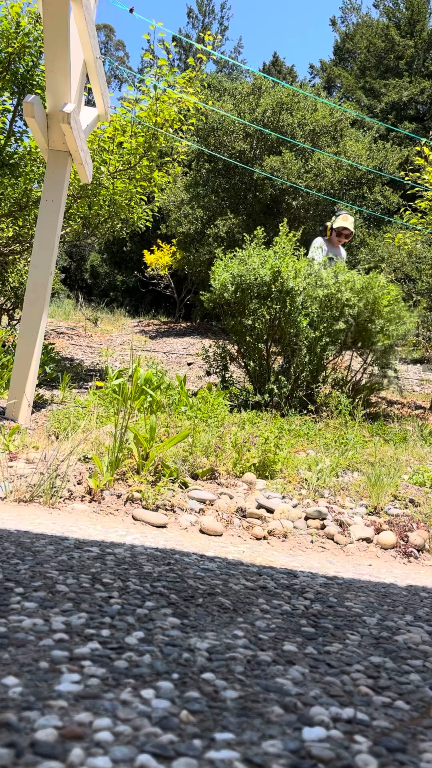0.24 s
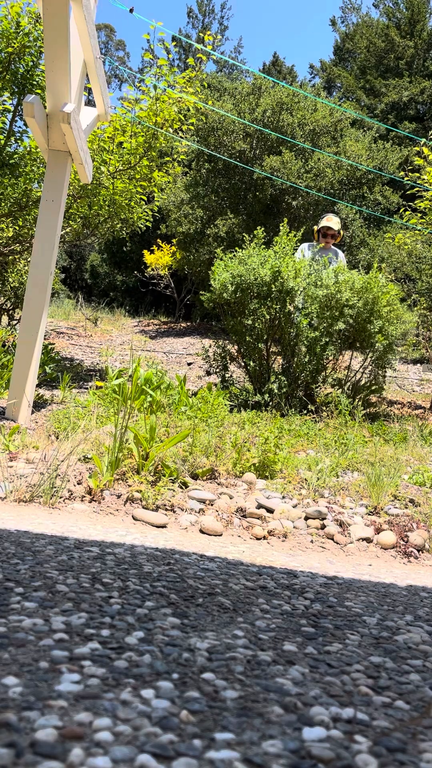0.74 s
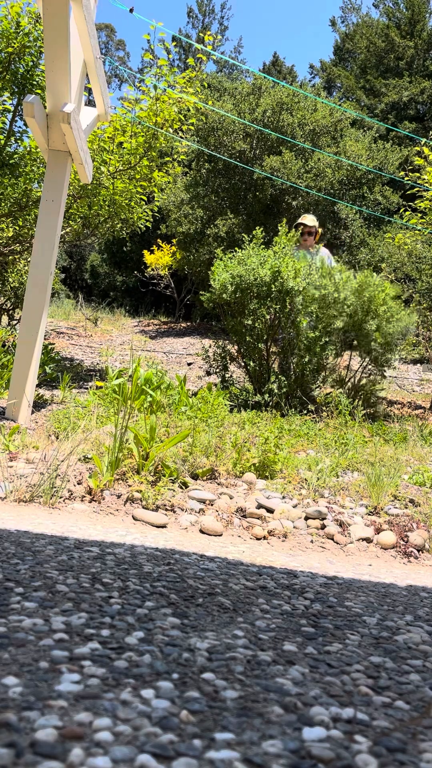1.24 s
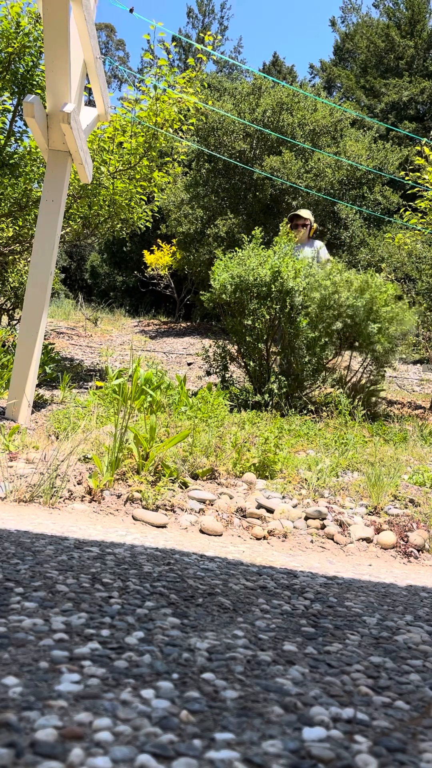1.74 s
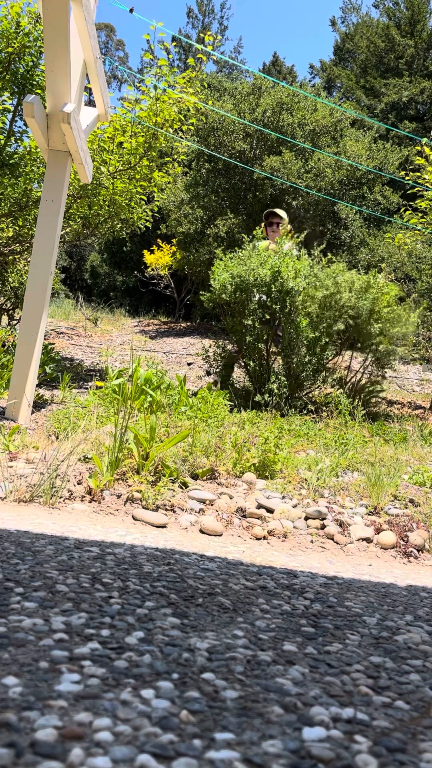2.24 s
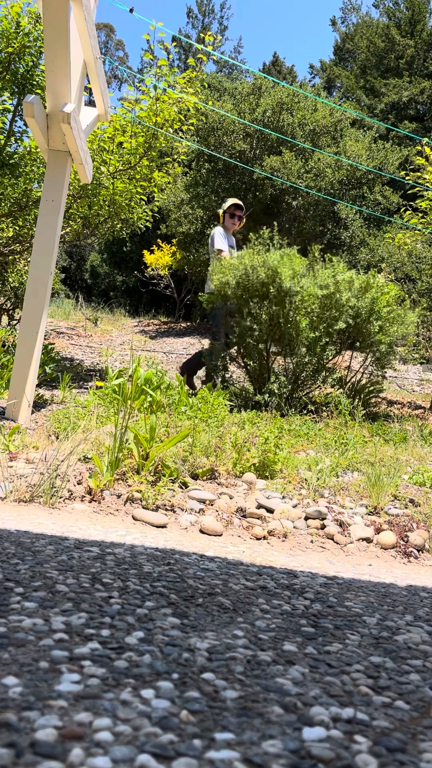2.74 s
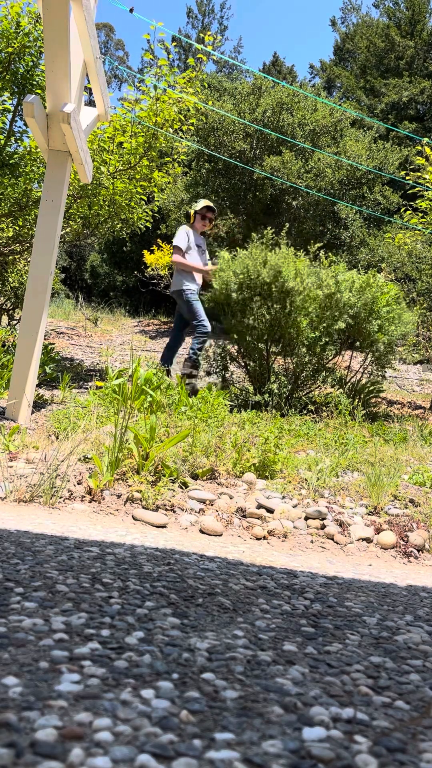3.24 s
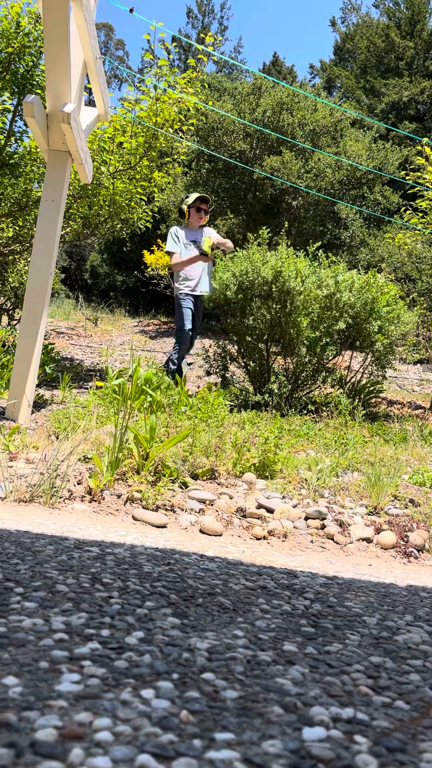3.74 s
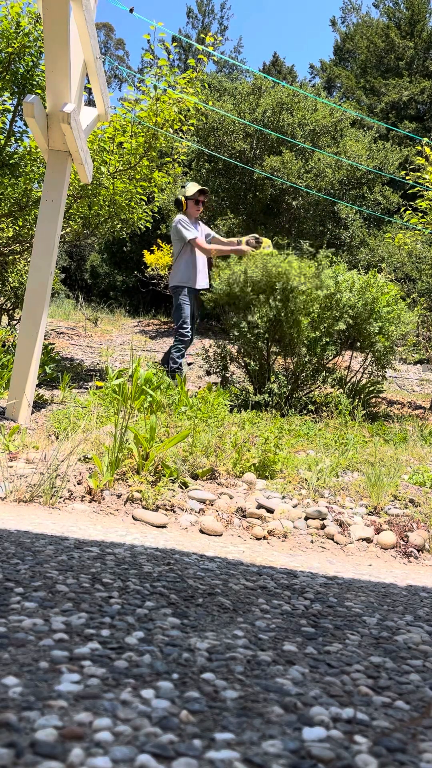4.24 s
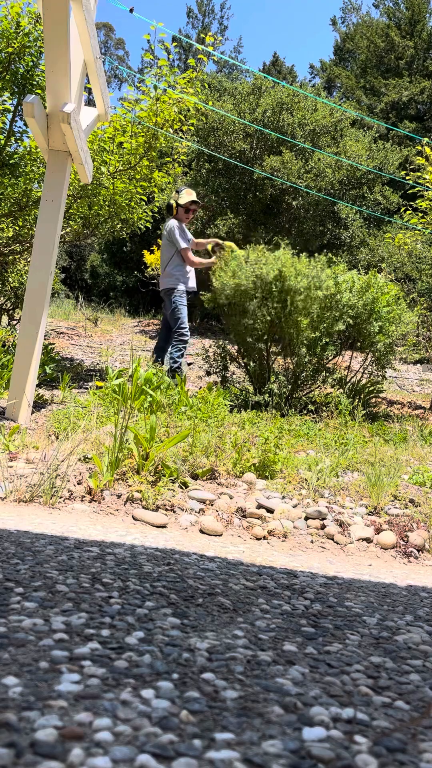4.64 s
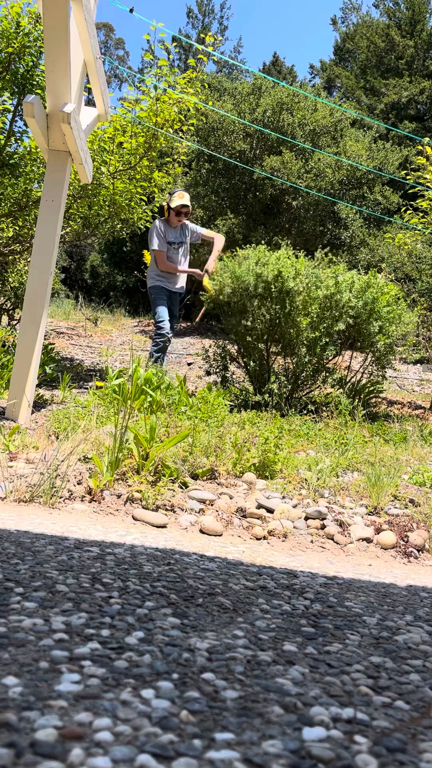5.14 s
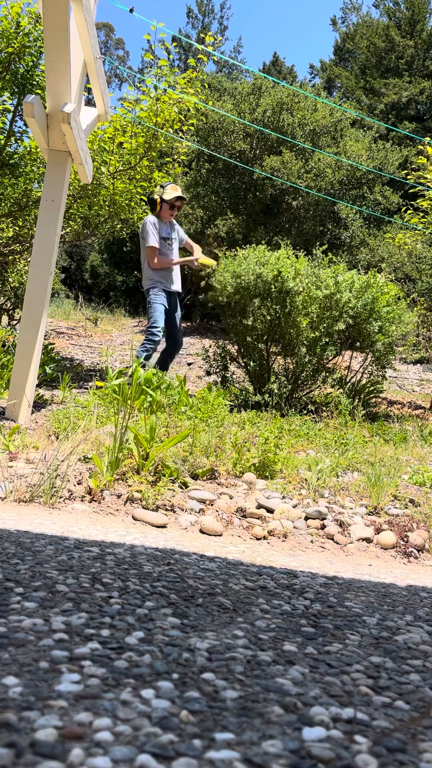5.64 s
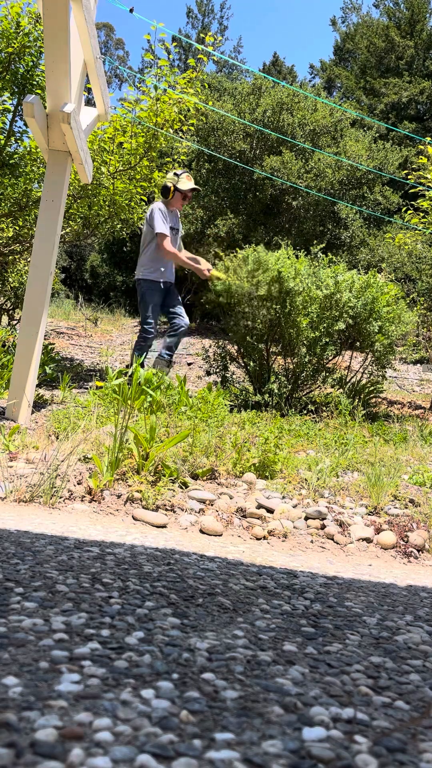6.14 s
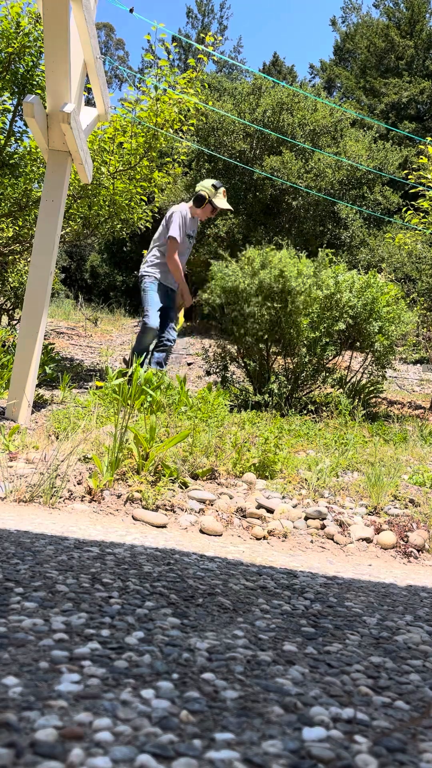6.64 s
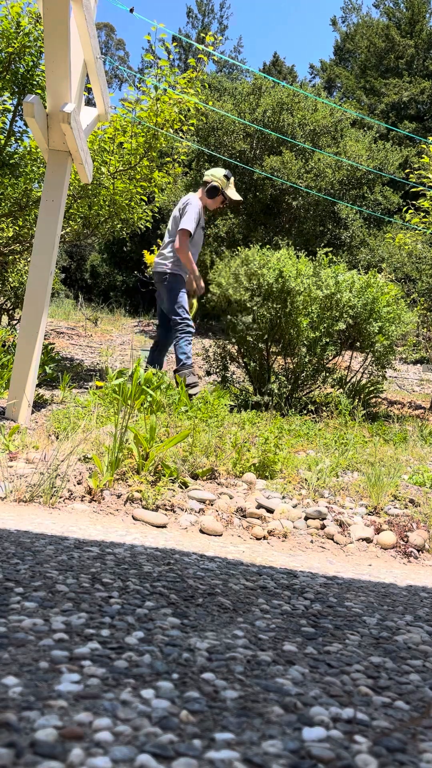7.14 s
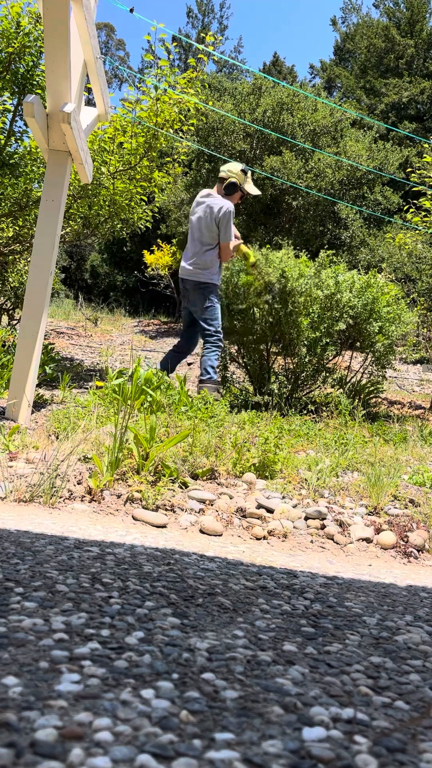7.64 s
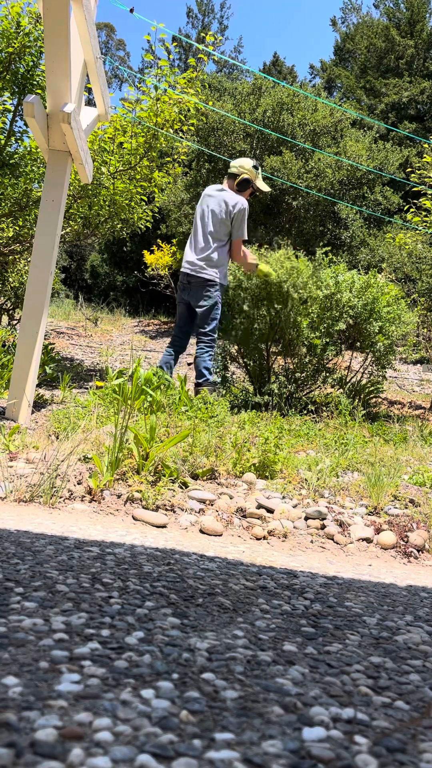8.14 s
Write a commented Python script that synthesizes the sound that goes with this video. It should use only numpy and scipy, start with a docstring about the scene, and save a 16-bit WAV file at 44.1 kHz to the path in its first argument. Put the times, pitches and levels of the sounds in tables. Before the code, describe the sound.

A hedge trimmer runs throughout about 8.4 seconds, some metres from a stereo microphone pair in a garden. It starts nearly end-on, its blades rattling about 39 strokes a second over a gritty gear buzz, low hum and thin wavering whine. Around 1.1 seconds it sags noticeably in thick growth and several twigs crack; it bogs again at 2.4 with sharp snaps. A smaller dip and snaps come at 4.1, a slight drag without a loud crack at 5.2, then another slowdown with a splintery cluster at 6.2. Near 6.7 the tool turns end-on and the bar's ring recedes; by 7.4 it swings broadside, its metallic clatter fuller, and strong snaps run through 7.4-7.7 and 8.0-8.2 with two more dips. It never stops. Beneath lie soft low outdoor rumble and a faint far machine hum, with short scatter from ground and bushes.

```python
"""A hedge trimmer some metres off in a garden, heard by a microphone pair over outdoor rumble and a far hum.
It opens nearly end-on, blades rattling 39 strokes a second over a gear buzz, a low hum and a thin motor whine.
Around 1.1, 2.4, 4.1 and 6.2 s it slows in thick growth and twigs snap; a brief drag at 5.2 s has no loud snap.
It turns end-on again near 6.7 s, then swings broadside by 7.4 s for a last run of snaps and two more slowdowns.
Noise and tiny impacts ring the tool's parts, bursts make the twigs, and sines that follow the strokes the motor."""
import sys
import numpy as np
from scipy import signal
from scipy.fft import rfft, irfft, next_fast_len
from scipy.io import wavfile
from scipy.ndimage import uniform_filter1d, map_coordinates

SR = 44100
rng = np.random.default_rng(int(sys.argv[2]) if len(sys.argv) > 2 else 0)


def unload_audio(sound):
    """Save the sound as a 16-bit wav file, at the path given as the first command line argument."""
    columns = np.transpose(np.atleast_2d(sound))
    # keep every value between -1 and 1, then stretch to whole-number steps
    steps = np.round(np.clip(columns, -1, 1) * 32767)
    wavfile.write(sys.argv[1], SR, steps.astype(np.int16))


N = 369558

# resonances of the gear case, hand guard, blade bar, blade teeth and free blade tip, relative within each part:
# centre_hz, half_width_hz (where it is 6 dB down), level_db
CASE_MODES = [(756, 450, -1.5), (1166, 416, 3), (1494, 254, -0.5), (4770, 400, -0.5)]
GUARD_MODES = [(1936, 195, 0)]
BAR_MODES = [(2602, 360, -0.2), (2806, 320, -0.8)]
TEETH_MODES = [(3638, 235, 14.5), (3780, 430, -9)]
TIP_MODES = [(7470, 170, 0), (12300, 240, -6)]
# colour of steel sliding on steel and leaves: frequency_hz, relative_density_db
HISS_COLOUR = [(380, -3.5), (600, 0.5), (1500, -7), (3200, 5.5), (4200, -1), (5000, 4), (6000, 6.5),
               (7000, 4), (8000, 3.5), (8800, 2), (11200, 1), (13000, 2), (15800, -8)]
# level of each part as the tool turns: end_on_db, half_turned_db, broadside_db
CASE_DB = (-45, -44.5, -47.5)
BAR_DB = (-52.5, -43.5, -36.5)
TEETH_DB = (-49.5, -43.5, -44.5)
HISS_DB = (-46.5, -43, -43)
# course of the guard's ring, ahead of an overall trim: time_s, relative_level_db
GUARD_COURSE = [(0.1, -41), (0.9, -42), (1.39, -43), (1.88, -69.5), (3.6, -40.5), (3.9, -49), (5.29, -47.5),
                (6.4, -40.5), (6.95, -41), (7.5, -41), (7.9, -46), (8.3, -37)]
# how the blade is held: time_s, facing (0 = end-on, 1 = broadside)
FACING = [(.45, 0.097), (.75, 0.54), (1.6, 0.39), (2.15, 0.8), (2.85, 0.36), (3.2, 0.54), (3.85, 0.83),
          (4.2, 0.61), (4.55, 0.83), (5.3, 0.56), (5.9, 0.86), (6.2, 0.75), (6.5, 0.33), (6.7, 0.1),
          (7.15, 0.1), (7.42, 0.89), (8.03, 0.94), (8.25, 0.65)]
# passes through the leaves: deepest_s, length_s, extra_hiss_db, extra_teeth_db
PASSES = [(1.101, 0.74, 2.5, 2.5), (1.64, 0.85, 2.5, 3.5), (2.45, 0.32, 3.5, 1), (3.13, 0.42, 0, 5),
          (3.6, 0.75, 1.5, 3), (4.075, 0.48, 1, 1), (4.903, 1, 0, 4), (5.523, 0.69, 1.5, 5.5),
          (6.21, 0.56, 3.5, 8.5), (6.5, 0.37, 4.5, 2), (7.44, 0.41, 3, 2.5), (7.602, 0.51, 4, -0.5),
          (8.241, 0.42, 6, 1)]
# thick growth loading the motor: deepest_s, length_s, strokes_per_second_lost
LOADS = [(1.09, .816, 3.79), (2.436, .401, 3.32), (4.093, .517, 1.64), (5.213, .31, .51),
         (6.209, .463, 2.07), (7.555, .339, 1.41), (8.247, .319, 1.85)]
# lobes and nulls that sweep past as the tool is swung: peak_s, length_s, first_hz, last_hz, gain_db
LOBES = [(0.17, 2, 1390, 1510, 5.5), (0.096, 1, 2300, 2320, -3), (1.05, 1.6, 1600, 2080, 2.5),
         (1.55, 0.91, 8200, 7250, 6), (1.63, 0.49, 1340, 1220, 3), (1.75, 1.5, 12300, 12500, -6),
         (2.3, 0.6, 2950, 2300, 2.5), (2.95, 0.89, 4380, 4800, -4), (2.892, 0.7, 1427, 1950, 2),
         (3.895, 0.78, 1530, 1430, 4.5), (3.9, 2.9, 7000, 6850, 6), (4.164, 0.63, 2320, 2700, 9.5),
         (4.45, 0.81, 705, 760, 8.5), (5.89, 0.65, 2450, 2040, 5.5), (6.35, 1, 1560, 1530, 7.5),
         (5.35, 0.9, 1520, 1580, 4), (6.496, 0.41, 5040, 5230, 6.5), (7.604, 0.4, 1430, 1390, 7.5),
         (7.95, 0.75, 2220, 2200, 6.5)]
# the loudest twigs cut, ahead of the trims for wood and splinters: start_s, relative_crack_db, relative_splinter_db
SNAPS = [(1.043, -18, -45), (1.075, -19, -36), (1.189, -18, -38), (1.246, -31, -36), (1.27, -21, -45),
         (2.348, -17.5, -36.5), (2.429, -15.5, -36.5), (2.583, -31, -43), (4.157, -18, -38),
         (4.183, -19, -33), (6.098, -23, -34), (6.168, -15, -34), (6.18, -21, -36), (6.247, -23, -40),
         (7.432, -12, -39), (7.535, -13.5, -37), (7.615, -23, -34), (7.683, -37, -35.5),
         (7.971, -17.5, -46), (8.068, -17, -55), (8.229, -13.5, -33)]
# colour of a twig parting: frequency_hz, relative_density_db
TWIG_COLOUR = [(200, -6), (700, -4), (2700, -1), (5500, -7), (15000, -28)]
# colour of the gear knocks: frequency_hz, relative_level_db
GEAR_COLOUR = [(100, -20), (200, -14), (330, -2), (400, -14.5), (520, -4), (680, 0), (1100, -3),
               (1500, 2.5), (2400, -26), (3000, -48)]
# hum of the drive: multiple_of_stroke_rate, level_db
DRIVE = [(5, -71), (6, -68.5), (8, -67), (9, -69.5)]
# whine of the motor: multiple_of_stroke_rate, mean_level_db
WHINE = [(76.3, -61), (190.5, -58.5)]
# colour of the outdoor background: frequency_hz, relative_density_db
AIR_COLOUR = [(30, -17), (58, 2), (90, 0), (140, -2), (210, -8), (310, -5.5), (390, -19), (600, -18),
              (1200, -16), (4000, -39), (15000, -23)]
# mean level of the outdoor rumble: time_s, level_db
RUMBLE = [(0.1, -48), (0.8, -51), (5.6, -50.5), (8.3, -49)]
# hum of a machine far off: pitch_hz, mean_level_db
FAR_HUM = [(83, -61.5), (100, -65.5), (178, -64), (237, -64.5), (296.5, -61.5)]
# phase between the microphones: frequency_hz, left_leads_rad
LEAD = [(90, -0.0), (520, -0.8), (1000, -0.2), (2350, -0.2), (3300, 2.0), (4200, 0.0), (4650, -1.7),
        (4950, 1.0), (5350, 1.7), (5750, 3.1), (6300, 3.4), (7650, 6.2), (8800, 6.6), (9700, 9.3),
        (10450, 9.5), (11800, 12.5), (13100, 12.8), (14000, 15.4), (15800, 16.0)]
# level between the microphones: frequency_hz, left_minus_right_db
TILT = [(90, 0.5), (340, 2), (600, -2), (1400, 1.5), (1850, -2), (2250, 8.5), (2700, -6.5), (3200, -4.5),
        (3600, -3.5), (4100, 4), (4500, -20), (5100, 4), (6000, -0.5)]
# likeness of the two sides, ahead of the blur: frequency_hz, likeness (1 = the same)
ALIKE = [(1400, 1), (2200, 0.85), (3600, 1), (4700, 0.95), (5800, 1)]

FREE_RATE = 39.26  # strokes per second with the blades running free
# contact within a stroke, as shares of the stroke: its rise, and its release on the way out and back
STROKE_ATTACK, RELEASE_OUT, RELEASE_BACK = .11, .68, .48
REVERSAL_DB = -5.8  # fall of the rattle as the blades turn round
# the gear case lies next to the guard and carries the teeth: its shares of their swings in dB
CASE_WITH_GUARD, CASE_WITH_TEETH = 0.075, 0.15
# thin shoots: chance that a stroke cuts one under full load, and level on the scale of the snaps
SHOOT_CHANCE, SHOOT_DB = 0.84, -31
CRACK_ATTACK_S = .0011  # time constant of a crack's rise
GEARS_DB = -51
LOW_CUT_HZ, TOP_HZ = 33, 15850  # band of the recorder


def amp(db):
    """Decibels to gain."""
    return 10 ** (np.asarray(db) / 20)


def unit(x):
    """Scale to rms 1."""
    return x / np.sqrt(np.mean(x ** 2) + 1e-20)


def along(points, hz):
    """Read (Hz, value) points on a log frequency axis."""
    f, v = np.transpose(points)
    return np.interp(np.log(hz + 1), np.log(np.abs(f) + 1), v)


def curves(rows):
    """One value per sample for each column after the time."""
    s, *cols = np.transpose(rows)
    return [np.interp(np.arange(N) / SR, s, c) for c in cols]


def wobble(rate):
    """A smooth random curve with rate knots a second."""
    knots = rng.standard_normal(int(N * rate / SR) + 4)
    return map_coordinates(knots, [np.arange(N) * rate / SR])


def filtered(x, response):
    """Multiply the spectrum of x by a complex response of frequency."""
    m = next_fast_len(N + SR // 4, real=True)
    return irfft(rfft(x, m) * response(np.fft.rfftfreq(m, 1 / SR)), m)[..., :N]


def coloured(x, spectrum):
    """Shape x by a (Hz, dB) spectrum."""
    return filtered(x, lambda hz: amp(along(spectrum, hz)))


def ringing(x, modes):
    """Pass x through damped resonances, each squared for steep skirts."""
    def response(f):
        return sum(amp(db) * (2j * f * w / (c * c - f * f + 2j * f * w)) ** 2 for c, w, db in modes)
    return filtered(x, response)


def impacts(rate, spread_db):
    """Tiny contacts, rate a second, at random moments and of either sign."""
    hits = rng.random(N) < rate / SR
    signs = rng.choice([-1, 1], N)
    return unit(hits * signs * amp(spread_db * rng.standard_normal(N)))


def swells(rows):
    """The effects of each row (s, length s, effect, ..) rise and fall evenly; one curve per effect."""
    t = np.arange(N) / SR
    return sum(np.outer(effects, np.clip(1 - np.abs(t - s) / (length / 2), 0, 1))
               for s, length, *effects in rows)


def turned(values):
    """A parabola through the end-on, half-turned and broadside values follows the tool as it turns."""
    parabola = np.polyfit([0, .5, 1], values, 2)
    return np.polyval(parabola, curves(FACING)[0])


def blades(strokes, cut, extra_hiss_db, extra_teeth_db, jolt_db, guard_db):
    """Sliding and rattling of the blades excite every part of the tool at once; a cut jolts them all."""
    guard, = curves(GUARD_COURSE)
    case_db = turned(CASE_DB) + CASE_WITH_GUARD * (guard - guard.mean()) + CASE_WITH_TEETH * extra_teeth_db
    gains = amp([case_db, guard + guard_db, turned(BAR_DB), turned(TEETH_DB) + extra_teeth_db])
    hiss_db = turned(HISS_DB) + extra_hiss_db
    force = contact_force(strokes, tooth_db=.75, scatter_db=.85)

    def rub(rate, spread_db, slide, flutter_db):
        """Each part chatters on its own under the common force."""
        chatter = impacts(rate, spread_db) + slide * rng.standard_normal(N)
        return force * amp(flutter_db * wobble(130)) * chatter

    # three ranges of the hiss come from different spots along the blade
    rasp = 0
    for lo, hi in [(0, 6000), (6000, 10000), (10000, SR)]:
        spot = rub(rate=1800, spread_db=3.5, slide=0.82, flutter_db=1.2)
        rasp = rasp + filtered(spot, lambda hz: (hz >= lo) & (hz < hi))
    hiss = coloured(rasp, HISS_COLOUR)
    tip = ringing(force * rng.standard_normal(N), TIP_MODES)
    treble = amp(hiss_db) * (unit(hiss) + amp(-9.5) * unit(tip))

    rings = [unit(ringing(rub(rate=2200, spread_db=2.0, slide=0.49, flutter_db=1.24), modes))
             for modes in (CASE_MODES, GUARD_MODES, BAR_MODES, TEETH_MODES)]
    # the jolt takes the colour of whichever parts face the listener
    jolt = amp(jolt_db) * cut / np.linalg.norm(gains, axis=0)
    body = np.hypot(1, jolt) * np.sum(gains * rings, axis=0)
    return lobed(treble + body, width_share=0.092, patchy_db=1.9)


def contact_force(strokes, tooth_db, scatter_db):
    """Blades slap together after each reversal, slide and let go; three passing teeth ripple the force."""
    u = strokes % 1
    release = np.where(strokes % 2 < 1, RELEASE_OUT, RELEASE_BACK)
    slack = np.clip(np.maximum(1 - u / STROKE_ATTACK, (u - release) / (1 - release)), 0, 1)
    teeth = np.cos(6 * np.pi * (u - STROKE_ATTACK))
    return amp(REVERSAL_DB * (slack - slack.mean()) + tooth_db * teeth + scatter_db * wobble(FREE_RATE))


def lobed(x, width_share, patchy_db):
    """Each lobe or null grows, glides and fades as the tool is swung; weaker random ones come and go."""
    hz, t, z = signal.stft(x, SR, nperseg=1024)
    across_hz = uniform_filter1d(rng.standard_normal(z.shape), size=6, axis=0)
    gain_db = patchy_db * unit(uniform_filter1d(across_hz, size=20, axis=1))
    for s, length, first_hz, last_hz, db in LOBES:
        u = np.clip((t - s) / length + .5, 0, 1)
        off = hz[:, None] / (first_hz + u * (last_hz - first_hz)) - 1
        gain_db = gain_db + db * np.sin(np.pi * u) * np.exp(-(off / width_share) ** 2)
    return signal.istft(z * amp(gain_db), nperseg=1024)[1][:N]


def gears(strokes, count=150, size=8192, channels=3):
    """Gears knock in a pattern repeated every two strokes: a dense buzz from several faces in changing shares."""
    orders = np.arange(count)
    knocks = np.exp(2j * np.pi * rng.random((channels, count))) * (orders > 0)
    cycles = irfft(knocks * amp(along(GEAR_COLOUR, orders * FREE_RATE / 2)), size)
    shares = np.array([wobble(2) for _ in cycles])
    crank = strokes / 2 % 1
    faces = np.array([np.interp(crank, np.arange(size) / size, cycle) for cycle in cycles])
    return amp(GEARS_DB) * unit(np.sum(shares * faces, axis=0) / np.linalg.norm(shares, axis=0))


def motor(strokes):
    """Low orders of the drive, and thin wavering whines that follow its speed."""
    turn = 2 * np.pi * strokes
    hum = sum(amp(db) * np.sin(multiple * turn) for multiple, db in DRIVE)
    whine = sum(amp(db + 4 * wobble(14)) * np.sin(multiple * turn + 1.1 * wobble(110))
                for multiple, db in WHINE)
    return hum + whine


def bites(strokes, sag, tear_t60, crack_t60, crack_db, shoot_splinter_db):
    """Twigs crack, then their last fibres tear; under load the closing teeth also snip thin shoots."""
    t = np.arange(SR // 10) / SR
    decay = amp(-60 * t / crack_t60) + 0.21 * amp(-60 * t / tear_t60)
    burst = decay * (1 - np.exp(-t / CRACK_ATTACK_S))
    closing = np.diff(np.floor(strokes), prepend=np.floor(strokes[0])) > 0
    shoots = closing & (rng.random(N) < SHOOT_CHANCE * sag / sag.max())
    # two rows: force of the cut, force of the splintering
    force = shoots * amp([[SHOOT_DB], [SHOOT_DB + shoot_splinter_db]])
    for s, crack, splinter in SNAPS:
        force[:, round(s * SR)] += amp([crack + crack_db, splinter])
    return signal.fftconvolve(force, burst[None], axes=1)[:, :N]


def twigs(cut, splintering, wood_db, splinter_db):
    """Crushed wood gives a dull crunch and a spray of bright little ticks."""
    wood = unit(coloured(rng.standard_normal(N), TWIG_COLOUR))
    tick_colour = [(3000, -3.0), (8000, 3.5), (13000, 1.0), (16000, -10.5)]  # frequency_hz, gain_db
    ticks = unit(coloured(impacts(rate=3700, spread_db=2), tick_colour))
    return amp(wood_db) * cut * wood + amp(splinter_db) * splintering * ticks


def garden(x, near_s, far_s, count):
    """Scatter from ground, bushes and wall: several delayed paths whose lengths drift slowly."""
    n = np.arange(N)
    delays = rng.uniform(near_s, far_s, count)
    paths = [x.take((n - SR * (d + .0007 * wobble(1.3))).astype(int), mode="clip") for d in delays]
    return sum(paths) / np.sqrt(count)


def outdoors():
    """Low rumble of the air as coloured noise, with the wavering sine hum of a machine far off."""
    t = np.arange(N) / SR
    rumble_db = curves(RUMBLE)[0] + 0.19 * wobble(2.44)
    rumble = amp(rumble_db) * unit(coloured(rng.standard_normal(N), AIR_COLOUR))
    hum = sum(amp(db + 3.2 * wobble(1.706)) * np.sin(2 * np.pi * hz * t + 0.89 * wobble(2.98))
              for hz, db in FAR_HUM)
    return rumble + hum


def microphones(direct, diffuse, blur):
    """The pair differs in phase and level; blur makes the sides less alike toward a quarter cycle apart."""
    def spread(hz):
        likeness = along(ALIKE, hz) - blur * np.sin(along(LEAD, hz)) ** 2
        return np.arccos(np.clip(likeness, 0, 1)) / 2

    mid = filtered(direct, lambda hz: np.cos(spread(hz)))
    side = filtered(diffuse, lambda hz: np.sin(spread(hz)))
    sign = np.array([[1], [-1]])  # left, right

    def pair(hz):
        return amp(sign * along(TILT, hz) / 2) * np.exp(.5j * sign * along(LEAD, hz))
    return filtered(mid + sign * side, pair)


def scene():
    """The trimmer, the twigs it cuts, their scatter in the garden and the outdoor air at the microphones."""
    sag, = swells(LOADS)
    extra_hiss_db, extra_teeth_db = swells(PASSES)
    strokes = np.cumsum(FREE_RATE - sag) / SR - .237  # running count of strokes
    cut, splintering = bites(strokes, sag, tear_t60=0.034, crack_t60=0.024, crack_db=-1.5,
                             shoot_splinter_db=-9.5)
    rattle = blades(strokes, cut, extra_hiss_db, extra_teeth_db, jolt_db=-10.5, guard_db=-7.5)
    snaps = twigs(cut, splintering, wood_db=-15, splinter_db=9.0)
    tool = rattle + gears(strokes) + snaps + motor(strokes)
    scatter = amp(-14) * garden(tool, near_s=.002, far_s=.02, count=8)
    direct = tool + scatter + outdoors()
    diffuse = garden(direct, near_s=.002, far_s=.012, count=5)
    return microphones(direct, diffuse, blur=0.61)


def record(dry):
    """The recorder cuts the deepest rumble and keeps nothing above its band limit."""
    return filtered(dry, lambda hz: (hz < TOP_HZ) * hz ** 4 / np.hypot(hz ** 4, LOW_CUT_HZ ** 4))


dry = scene()
out = record(dry)
unload_audio(out)
```